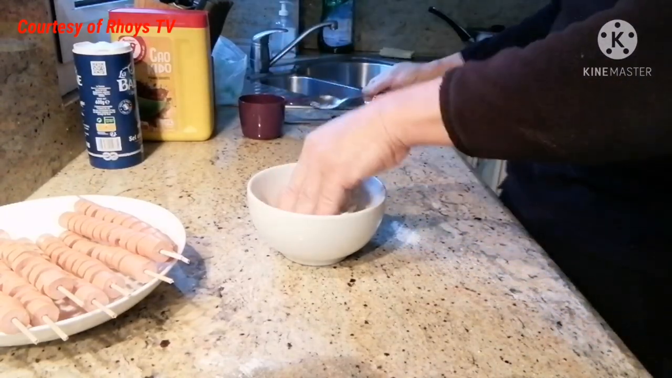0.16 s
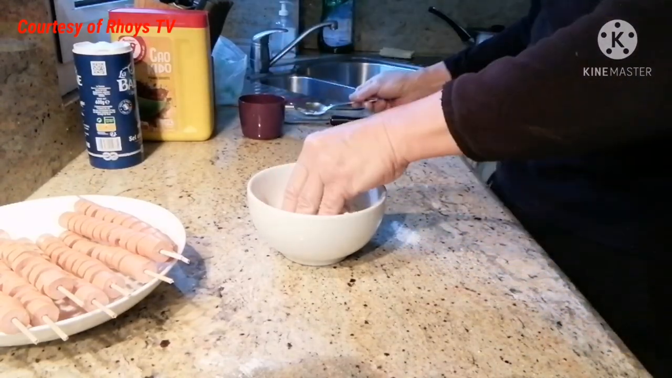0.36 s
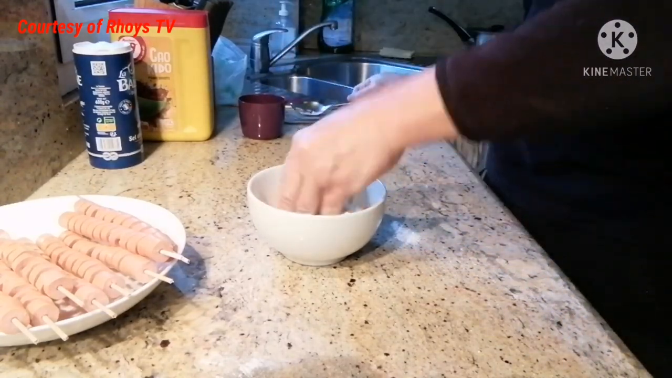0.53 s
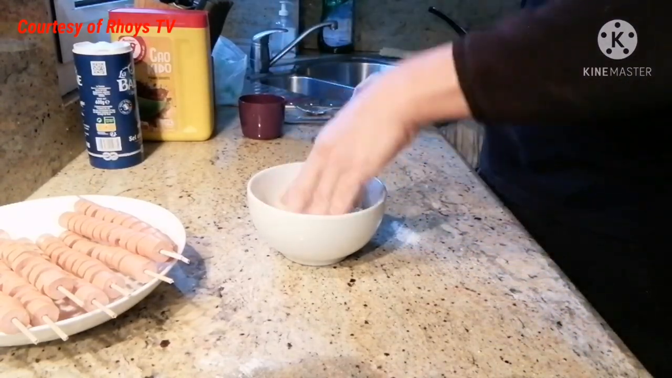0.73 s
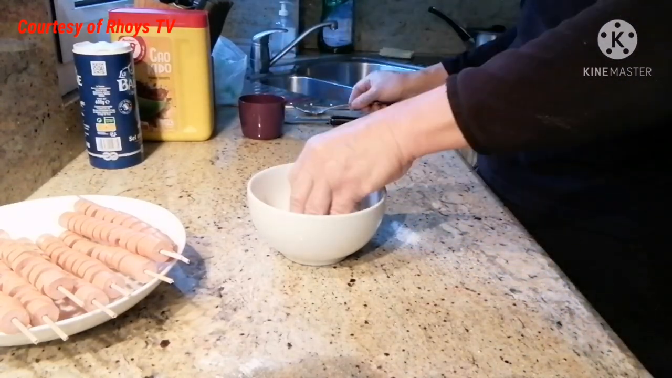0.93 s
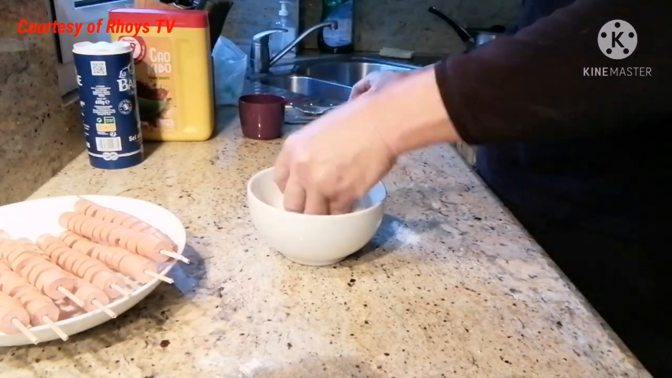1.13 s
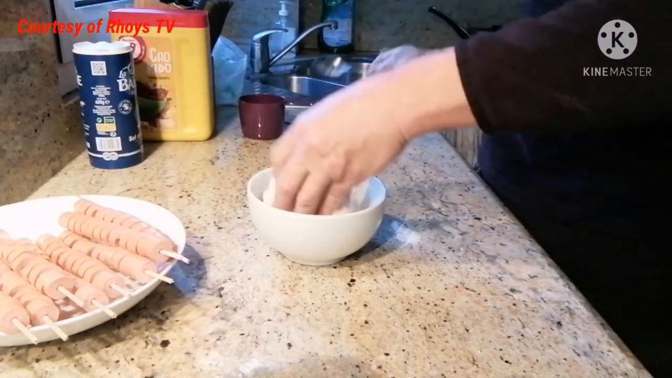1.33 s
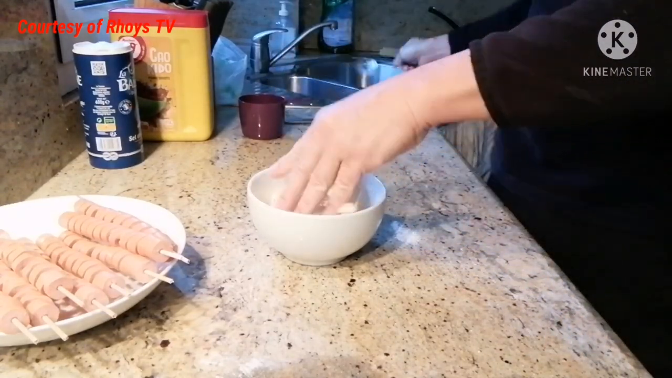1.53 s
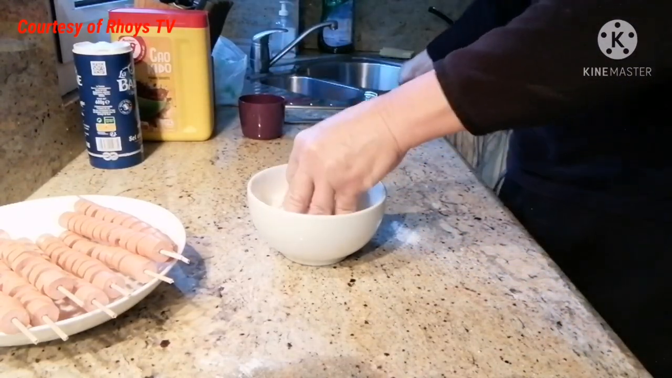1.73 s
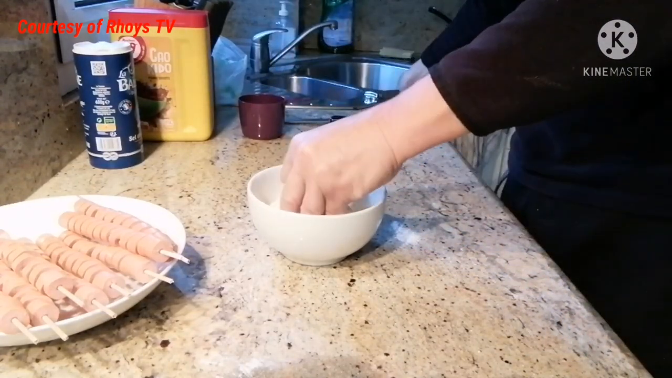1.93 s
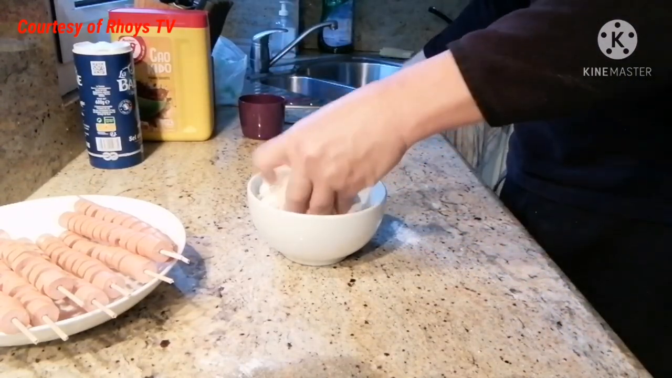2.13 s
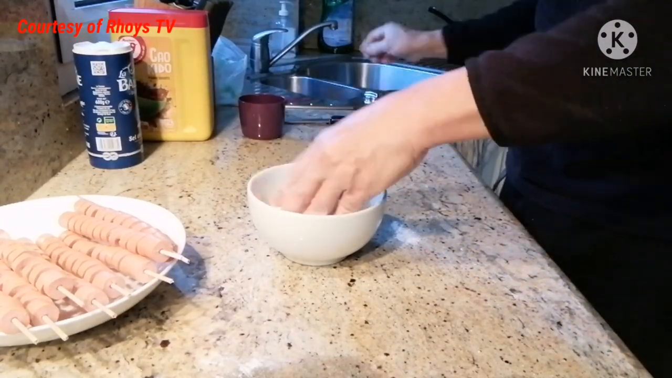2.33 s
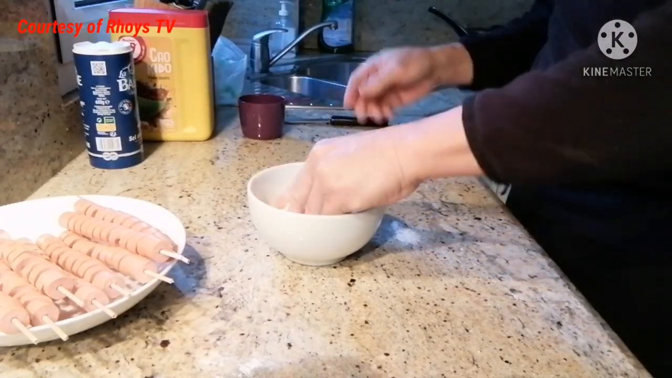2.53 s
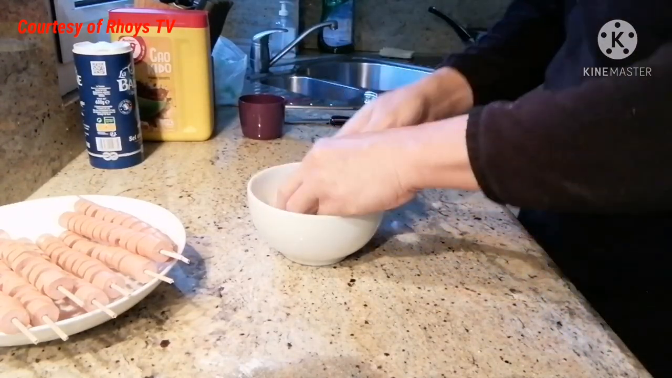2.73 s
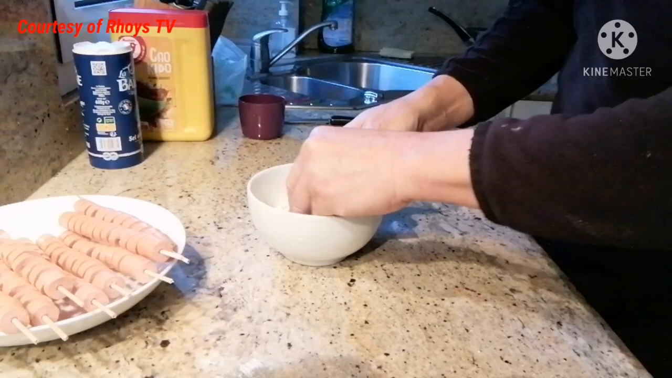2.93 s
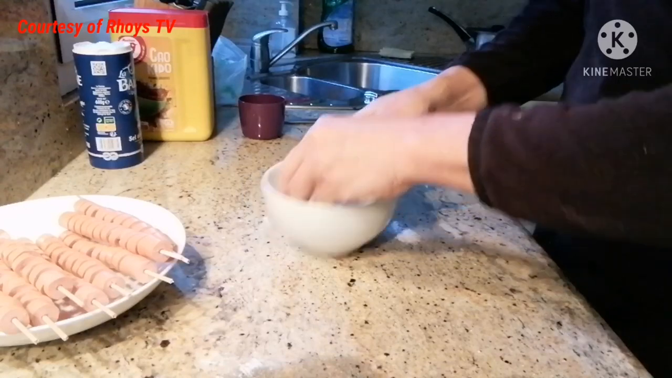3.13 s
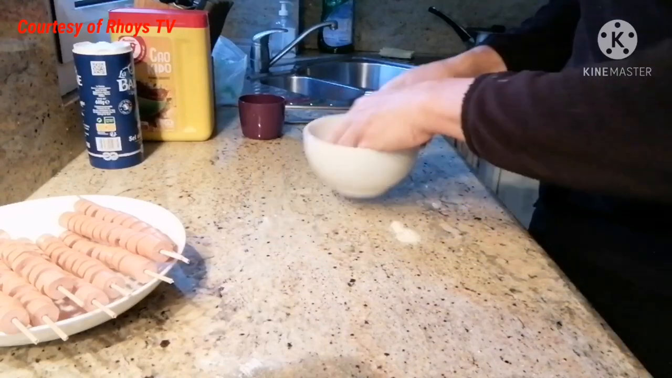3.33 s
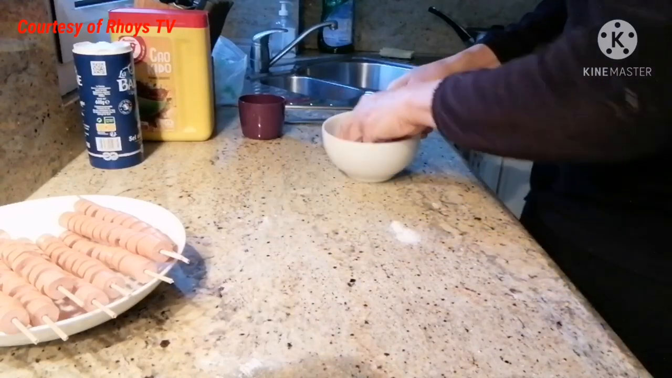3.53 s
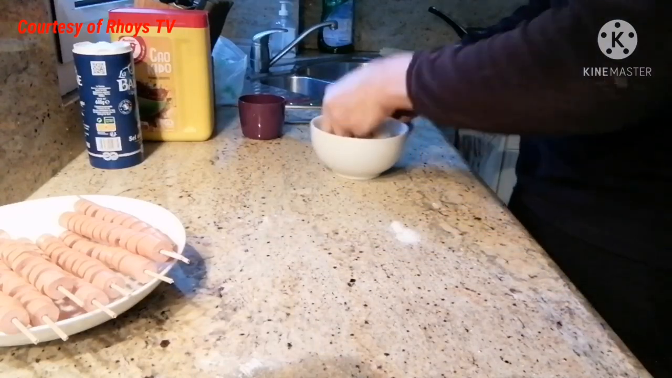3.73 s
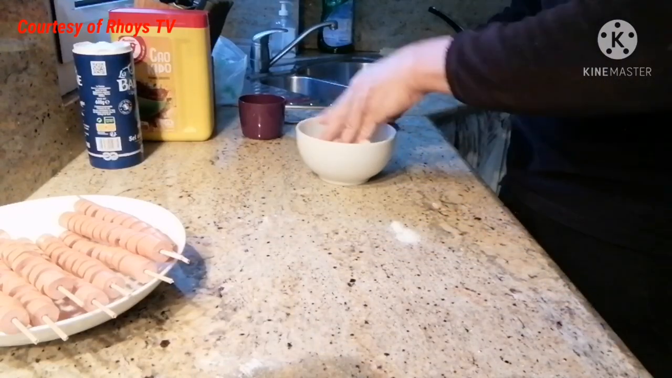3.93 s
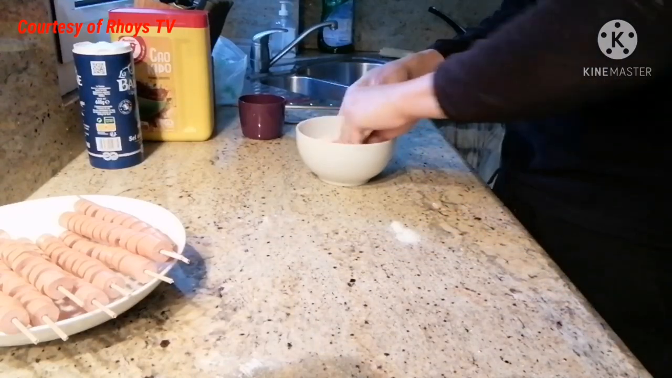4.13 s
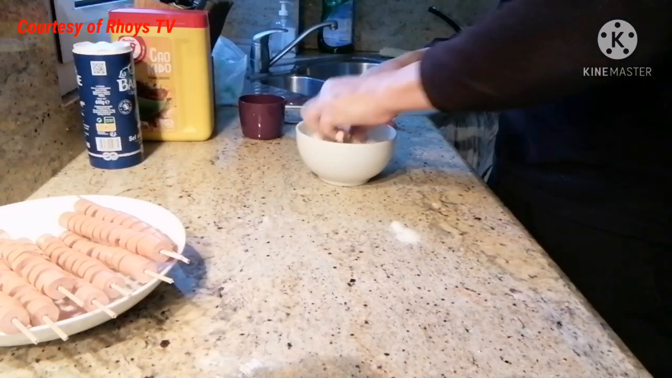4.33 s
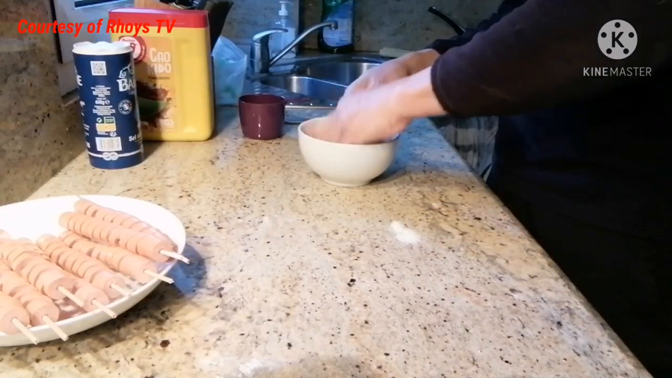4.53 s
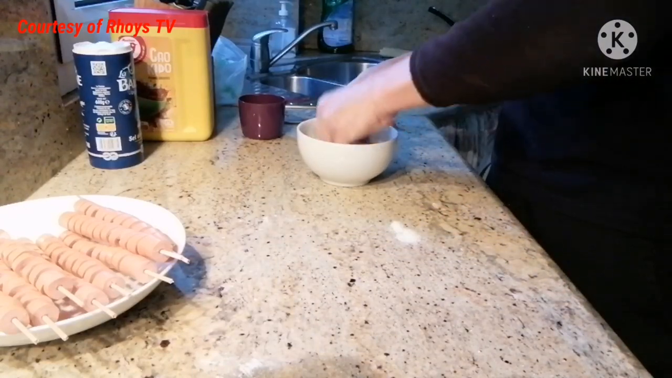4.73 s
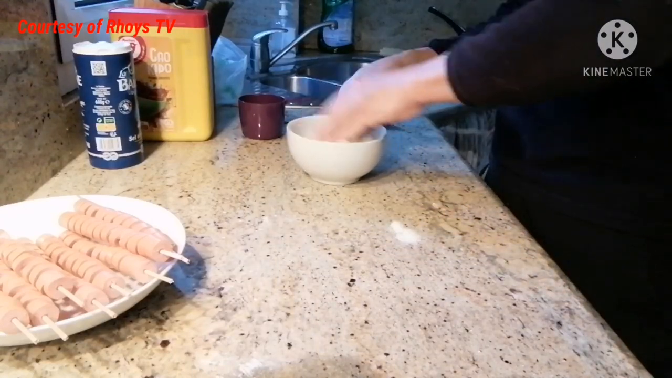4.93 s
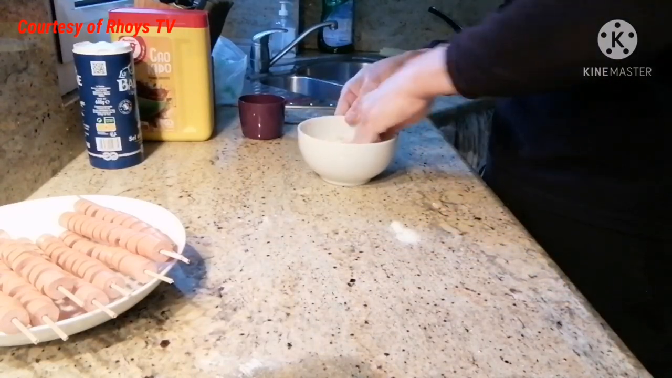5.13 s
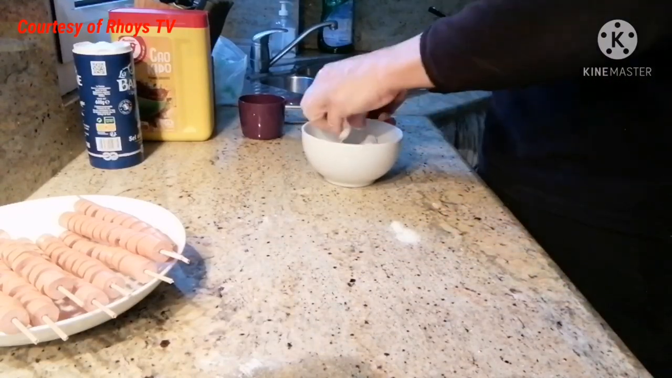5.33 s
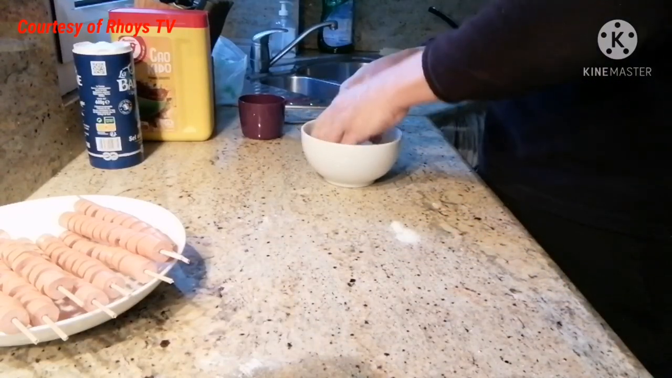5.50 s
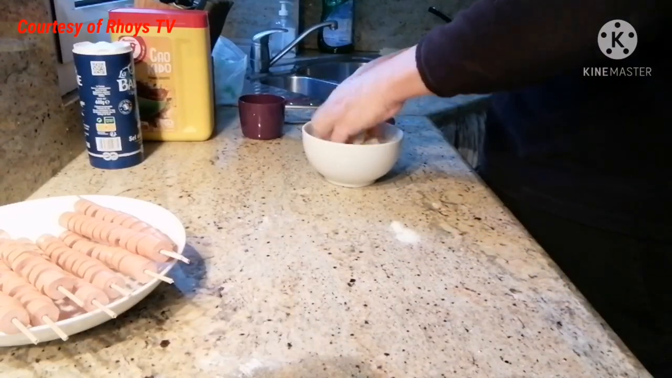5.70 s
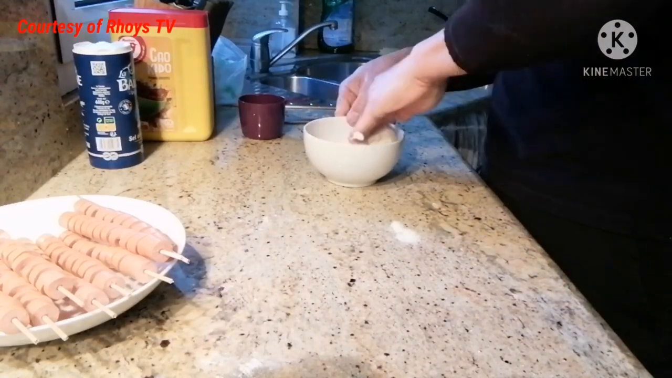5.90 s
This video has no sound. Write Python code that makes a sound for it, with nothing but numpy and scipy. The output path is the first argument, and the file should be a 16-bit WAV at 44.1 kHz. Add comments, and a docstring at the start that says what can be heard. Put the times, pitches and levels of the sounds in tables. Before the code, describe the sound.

Close stereo view of hand mixing on a kitchen counter: quiet at first, with airy motor noise, low hum and barely audible touches of the bowl. A quick burst of ringing metal comes from the sink, followed by a pause, a hard ceramic set-down, and shorter, softer knocks and wobbles. Brief room echoes follow, and the background dips slightly after the hard knock.

```python
"""In a hard-walled kitchen a hand mixes dough in a ceramic bowl on a stone counter.
An appliance runs behind: shaped noise for its fan and rumble, sines for its hum and whine; thin squeaks pass.
The bowl tips softly and dough snaps once (short noise); a utensil clatters on the steel sink (dense ringing
noise plus clear notes); then the bowl is set down and rocks on its foot (short modes plus gritty cracks), with
soft hand thumps (low modes) and another snap. A hard knock pulls the gain down, and it creeps back slowly."""
import sys
import numpy as np
from scipy import signal
from scipy.fft import rfft, irfft
from scipy.io import wavfile
from scipy.ndimage import uniform_filter1d

SR = 44100
rng = np.random.default_rng(int(sys.argv[2]) if len(sys.argv) > 2 else 0)


def master_out(mix):
    """Clip the mix to full scale and print it as 16-bit PCM to the path in sys.argv[1]."""
    frames = np.transpose(np.atleast_2d(mix))
    ceiling = np.clip(frames, -1, 1)
    pcm = np.round(ceiling * 32767).astype(np.int16)
    wavfile.write(sys.argv[1], SR, pcm)


N = 262836
RING = np.arange(SR) / SR  # one second of time [s]


def amp(db):
    """Decibels to gain."""
    return 10 ** (np.asarray(db) / 20)


def unit(x):
    """Scales to rms 1."""
    return x / np.sqrt(np.mean(x ** 2) + 1e-20)


def read(points, hz):
    """Reads a table on a log-frequency axis."""
    f, value = np.transpose(points)
    return np.interp(np.log(hz + 1), np.log(f + 1), value)


def lean(pan_db):
    """Left and right gains that differ by pan_db; positive leans left."""
    return amp([[pan_db / 2], [-pan_db / 2]])


def add(mix, s, sound, pan_db=0):
    """Mixes a sound in at time s, leaning left or right, and cuts it at the end of the mix."""
    part = mix[:, round(s * SR):][:, :sound.shape[-1]]
    part += (lean(pan_db) * sound)[:, :part.shape[1]]


# likeness of left and right in diffuse noise: (frequency [Hz], correlation [0-1])
LIKENESS = [(60, 0.98), (130, 0.99), (290, 0.53), (640, 0.22), (1400, 0), (15000, 0.0023)]


def noise(spectrum, size, bumps=()):
    """Coloured stereo noise of a diffuse field, rms 1: left and right are alike in the bass only."""
    hz = np.fft.rfftfreq(size, 1 / SR)
    a, b = rfft(rng.standard_normal((2, size)))
    same = np.clip(read(LIKENESS, hz), -1, 1)
    mid, side = a * np.sqrt(1 + same), b * np.sqrt(1 - same)
    db = read(spectrum, hz)
    for centre_hz, width_hz, bump_db in bumps:
        db = db + bump_db * np.exp(-2 * ((hz - centre_hz) / width_hz) ** 2)
    return unit(irfft(np.array([mid + side, mid - side]) * amp(db), size))


def fade(x, t60):
    """Lets each band die at its own speed."""
    hz, t, z = signal.stft(x, SR, nperseg=256)
    decay = amp(-60 * t / read(t60, hz)[:, None])
    return signal.istft(z * decay, SR, nperseg=256)[1][:, :x.shape[1]]


def mode(hz, t60, t, spread=None):
    """One dying mode; a spread [rad per kHz] sets left and right apart in phase, up to a limit."""
    skew = 0 if spread is None else np.clip(spread * hz / 1000, -np.pi / 4, np.pi / 4)
    return amp(-60 * t / t60) * np.sin(2 * np.pi * hz * t + np.array([[skew], [-skew]]))


def ripple(size, width_hz):
    """An uneven frequency response, rms 1: the crowded peaks of a metal sheet."""
    bins = max(round(width_hz * size / SR), 1)
    smooth = uniform_filter1d(rng.standard_normal(size // 2 + 1), bins)
    return unit(uniform_filter1d(smooth, bins))


# echo colour: (frequency [Hz], relative level [dB])
ROOM = [(100, 6.5), (200, 5), (400, 1), (650, -4.5), (900, 3), (1070, -5), (1250, -2.5), (1600, 0.5),
        (2500, 0.5), (5000, -5), (8000, -0.5), (15000, 1.5)]
# echo decay: (frequency [Hz], t60 [s])
ROOM_T60 = [(150, 0.56), (500, 0.43), (1000, 0.71), (2500, 0.54), (6000, 0.57), (14000, 0.34)]


def kitchen(x, build_s=0.021):
    """A hard-walled room whose echoes build up and die by band."""
    build_up = 1 - np.exp(-(RING / build_s) ** 2)
    tail = fade(noise(ROOM, SR), ROOM_T60) * build_up
    return signal.fftconvolve(x, tail / np.linalg.norm(tail[0]), axes=1)[:, :N]


# spectrum of the fan's air: (frequency [Hz], relative level [dB])
AIR = [(71, -34), (120, -5), (192, -3.5), (222, -9), (418, -3.5), (546, -10.5), (684, -1.5), (1240, -11.5),
       (1650, -10), (1790, -8.5), (3820, -13.5), (7200, -15.5), (9020, -26), (14700, -30.5), (16000, -24.5)]
# colour of the casing: (centre [Hz], width [Hz], boost [dB])
CASING = [(134.7, 60, 1.5), (620, 160, 2.5), (862, 86, 7.5), (1260, 680, 0.5), (1920, 280, 4.5),
          (2480, 160, 6.5), (4110, 810, -7), (5160, 250, 3), (6980, 640, 3)]


def fan(level_db=-55.5):
    """Broadband air noise, its spectrum bumped by the casing."""
    return amp(level_db) * noise(AIR, N, CASING)


# steady hum tones: (frequency [Hz], rms level before the lean [dB])
HUM = [(49.7, -61.5), (99.5, -69.5), (699, -73.5)]


def rumble_and_hum(rumble_db=-67, pan_db=3.5):
    """Low noise and steady hum tones, leaning left together."""
    t = np.arange(N) / SR
    rumble_spectrum = [(20, -25), (50, 2), (75, -7.5), (125, -2.5), (220, -14.0), (500, -69), (2000, -87)]
    rumble = amp(rumble_db) * noise(rumble_spectrum, N)
    hum = sum(amp(db) * np.sqrt(2) * np.sin(2 * np.pi * hz * (t + rng.random())) for hz, db in HUM)
    return (rumble + hum) * lean(pan_db)


# course of the whine's level: (time [s], level before the lift in whine() [dB])
WHINE = [(0.0, -77.5), (0.61, -72.5), (0.81, -71), (3.2, -66.5), (3.64, -70), (4.03, -76), (5.24, -71),
         (5.96, -73)]
# harmonics of the whine: (multiple of the pitch, relative level [dB])
WHINE_ORDERS = [(1, 0.5), (2, -15.5), (4, -16.5)]


def whine(pitch_hz=1760, waver_hz=2.55, lift_db=3.5):
    """A motor's harmonics on one slightly wavering pitch, set apart in phase between left and right."""
    t = np.arange(N) / SR
    drift = unit(uniform_filter1d(rng.standard_normal(N), SR // 12))
    phase = 2 * np.pi * np.cumsum(pitch_hz + waver_hz * drift) / SR
    offset = np.array([[0], [1]])  # left, right [rad]
    orders = sum(amp(db) * np.sqrt(2) * np.sin(round(k) * phase + offset) for k, db in WHINE_ORDERS)
    return amp(np.interp(t, *np.transpose(WHINE)) + lift_db) * orders


def appliance():
    """Fan noise, rumble, hum and motor whine sound together without a break."""
    return fan() + rumble_and_hum() + whine()


# faint high squeaks: (start [s], length [s], level [dB])
SQUEAKS = [(0.809, 0.081, -65), (2.88, .1, -66), (4.16, 0.18, -72)]
# their partials: (frequency [Hz], relative level [dB])
SQUEAK_NOTES = [(2850, -2), (5118, -2.5), (7748, 0)]


def squeaks():
    """A few thin partials swell and fade together."""
    out = np.zeros((2, N))
    for s, length, db in SQUEAKS:
        t = RING[:round(length * SR)]
        notes = sum(amp(g) * np.sin(2 * np.pi * (f * t + rng.random((2, 1)) / 3)) for f, g in SQUEAK_NOTES)
        add(out, s, amp(db) * np.hanning(len(t)) * notes)
    return out


# utensil hits the sink: (time [s], treble clash level [dB], mid clang level [dB], left-right lean of the clash [dB])
CLATTER = [(2.0802, -32.5, -45, -0.5), (2.123, -47, -52, -2), (2.238, -48, -53.5, 3),
           (2.2725, -28.5, -30.5, 4), (2.3242, -27.5, -38.5, -2.5), (2.388, -34.5, -42.5, 1),
           (2.432, -39, -44.5, -3)]
# spectra of the steel's treble clash, mid clang and low boom: (frequency [Hz], relative level [dB])
CLASH = [(900, -30), (2200, -4), (3200, -1), (4000, -6), (5200, 1), (7000, 2.5), (8500, -6.5),
         (11000, -8.5), (15000, -9)]
CLANG = [(250, -40), (550, -1), (900, 8), (1350, -4), (1600, 2), (2800, 1), (4500, -32)]
BOOM = [(50, -25), (80, -6.5), (110, -16), (170, -1), (300, 3.5), (410, 1.5), (520, -19), (1000, -42)]
# decay of the dense ringing, before a part's damping: (frequency [Hz], t60 [s])
STEEL_T60 = [(200, 0.48), (1000, 0.5), (3000, 0.46), (7000, 0.45), (11000, 0.39), (15000, 0.33)]
# clear notes of sink and utensil: (frequency [Hz], relative level before scatter [dB], t60 [s],
# driving part [0 clash, 1 clang, 2 boom])
STEEL_NOTES = [(187, -5, .4, 2), (295.6, -2, 0.38, 2), (364, -5.5, 0.2, 2), (398, 1.5, 0.27, 2),
               (591.7, -3.5, 0.33, 1), (1006, -11.5, .9, 1), (1300, 0, 0.38, 1), (2160, -14, 1.3, 1),
               (2740, -18, .4, 0), (4530, -11, 0.2, 0), (6450, -10, 0.35, 0), (7320, -13.5, 0.48, 0),
               (8535, -20, .42, 0), (11560, -32, .3, 0)]


def sink(rise_s=0.0021, strike_s=0.0067, chatter_db=1.5, scatter_db=1.5):
    """Thin steel has countless close modes that ring as noise, with clear notes on top; the utensil chatters."""
    boom_base_db, boom_follows = -25.5, 0.41  # the boom takes only this share of the clash's dB
    boom_pan_db, boom_damping = 4, 1.35
    flam_s, flam_db = 0.01, -14  # the utensil's other end follows each blow
    out, t = np.zeros((2, N)), RING[:SR * 3 // 4]
    attack = (1 - np.exp(-t / rise_s)) * (1 + np.exp(-t / strike_s) / 2)
    attack *= 1 + amp(flam_db) * (t > flam_s) * np.exp(-abs(t - flam_s) / strike_s)
    sheet = amp(3 * ripple(len(t), width_hz=40))
    for s, clash_db, clang_db, pan_db in CLATTER:
        chatter = amp(chatter_db * unit(uniform_filter1d(rng.standard_normal(len(t)), size=180)))
        spot = amp(2 * ripple(len(t), width_hz=410))  # each spot favours other regions of the spectrum
        boom_db = boom_base_db + boom_follows * clash_db
        parts = [(CLASH, clash_db, pan_db, 1), (CLANG, clang_db, 0, 1), (BOOM, boom_db, boom_pan_db, boom_damping)]
        for k, (spectrum, db, lean_db, damping) in enumerate(parts):
            dense = unit(irfft(rfft(noise(spectrum, len(t))) * sheet * spot, len(t)))
            dense = chatter * fade(dense, [(f, t60 / damping) for f, t60 in STEEL_T60])
            notes = 0
            for hz, note_db, t60, part in STEEL_NOTES:
                if round(part) == k:
                    gain = rng.choice([-1, 1]) * amp(note_db + scatter_db * rng.standard_normal())
                    notes = notes + gain * mode(hz, t60, t, spread=0.81)
            add(out, s, amp(db) * attack * (dense + notes), lean_db)
    return out


# sticky dough snaps off the fingers: (time [s], level [dB])
SNAPS = [(0.2945, -51), (5.41, -54.5)]


def dough_snaps(t60=0.059):
    """Small wet snaps: short bright noise that dies at once."""
    out, t = np.zeros((2, N)), RING[:SR // 4]
    for s, db in SNAPS:
        add(out, s, noise(CLASH, len(t)) * amp(db - 60 * t / t60))
    return out


# dull pushes of the hand: (time [s], level [dB])
THUMPS = [(4.063, -41.5), (5.112, -42), (5.133, -60), (5.181, -51)]
# low modes of the counter: (frequency [Hz], relative level [dB], t60 [s])
COUNTER = [(58.6, -1, 0.21), (98.3, -14.5, 0.41), (150, -3, 0.104), (284, -3, 0.039), (480, -8, 0.029)]


def counter_thumps(pan_db=3):
    """The hand's weight sets off the low modes of the counter."""
    out = np.zeros((2, N))
    for s, db in THUMPS:
        modes = sum(amp(g) * mode(f, t60, RING, spread=0.92) for f, g, t60 in COUNTER)
        add(out, s, amp(db) * modes, pan_db)
    return out


# the slab under the bowl's full weight: (frequency [Hz], relative level [dB])
THUD = [(50, -22), (80, -6), (110, -10.5), (160, 7), (230, -4), (340, -3.5), (500, -3), (700, 7.5),
        (1200, 1), (3000, -49.5)]


def set_down_thud(start_s=3.6312, level_db=-25, t60=0.093):
    """The slab answers the set-down with one short burst of low noise."""
    out, t = np.zeros((2, N)), RING[:SR // 5]
    add(out, start_s, noise(THUD, len(t)) * amp(level_db - 60 * t / t60))
    return out


# the bowl lands on one edge of its foot, then on the other: (time [s], blow level [dB],
# left-right lean before bowl() shifts it [dB], extra level of the wall modes [dB],
# extra level of the rim's clink [dB], rebound delay [s], rebound level against the blow [dB])
KNOCKS = [(3.6312, -9.5, 3.5, 4, 0, 0.016, -18.5), (3.7818, -17, 5.5, 3, 3, 0.015, -12.5),
          (4.6045, -18.5, 4, -3, 6, 0.0097, -.5), (4.6919, -17.5, 3.5, 5, -1, 0.012, 0.5),
          (5.003, -24, 7.5, -0.5, 12, .0376, -3), (5.527, -16, 6, 3, -4.5, .0086, -9)]
# the bowl tips softly under the hand: (time [s], level [dB])
ROCKS = [(0.265, -44), (0.3064, -42), (4.062, -39.5), (4.687, -25), (4.718, -30), (4.9877, -24),
         (5.0214, -22)]


def contacts():
    """Every touch of the foot, in the order bowl() unpacks it; harder knocks are brighter and start faster."""
    firm_db, firm_hz, hardening = -18, 3530, 0.6  # cut-off of a firm blow; it grows as this power of force
    rise_cycles = 0.44  # time constant of the onset, in cycles at the cut-off
    gritty_hz = 2500  # knocks softer than this crush less grit
    settle_per_db = 0.02  # the weaker the rebound, the flatter the bowl sits and the lower it rings
    for s, db, pan_db, wall_db, rim_db, after_s, rebound_db in KNOCKS:
        for late_s, less_db in [(0, 0), (after_s, rebound_db)]:
            hit_db = db + less_db
            hz = min(firm_hz * amp(hardening * (hit_db - firm_db)), SR / 3)
            soften = signal.butter(1, hz, fs=SR)
            grit, pitch = min(hz / gritty_hz, 1), 1 + settle_per_db * less_db
            yield s + late_s, hit_db, rise_cycles / hz, soften, grit, pitch, wall_db, rim_db, pan_db
    # a soft tip swells slowly, without grit, and its dull contact favours the lowest modes
    rise_s, dull_hz, wall_db, pan_db = 0.0024, 1240, -7, -3
    for s, db in ROCKS:
        yield s, db, rise_s, signal.butter(2, dull_hz, fs=SR), 0, 1, wall_db, 0, pan_db


# the bowl, damped by dough and hand: (frequency before settling [Hz], relative level before scatter [dB],
# t60 before the hand's limit [s])
BOWL = [(296, -28.5, 0.082), (497, -32, 0.079), (723, -21, 0.084), (935.4, -8.5, 0.071),
        (1070.5, -3, 0.073), (1310, -9.5, 0.039), (1427, -17.5, 0.051), (1560, -15, 0.072),
        (1695, -10.5, 0.039), (1992, -12.5, 0.051), (2258, -14.5, 0.089), (2550, -12, 0.034),
        (2815, -14, 0.03), (3340, -15, 0.035), (4280, -25, 0.022), (5200, -33, 0.039), (5860, -30, 0.034),
        (7020, -23, 0.077), (10790, -22.5, 0.053), (13100, -24, 0.041), (14640, -18, 0.061)]
# grit crushed under the foot: (frequency [Hz], relative level [dB])
CRACK = [(50, -25), (150, -6.5), (300, -12.5), (500, -8), (720, -3.5), (1000, 5.5), (1650, -2.5),
         (2500, -1.5), (4200, -9.5), (6500, -11.5), (8700, -28), (10500, -19.5), (15000, -28)]


def bowl(crack_db=-10, crack_t60=0.1, tick_s=0.0015, scatter_db=1, right_lag_s=0.00012, bass_hz=130):
    """Each contact rings the modes; knocks also crush grit; soft tips start slowly, sound dull, have no grit."""
    wall_hz, wall_width_hz, rim_hz = 1560, 160, 6500  # a tilted landing favours the wall modes
    held_t60, stiff_hz = 0.08, 3000  # the hand's limit [s]; settling detunes only modes below stiff_hz
    shift_db = -2.5  # moves every contact a little to the right
    out, t = np.zeros((2, N)), RING[:SR // 5]
    late = np.maximum(t - np.array([[0], [right_lag_s]]), 0)  # the modes reach the right a little later
    for s, db, rise_s, soften, grit, pitch, wall_db, rim_db, pan_db in contacts():
        ring = 0
        for k, (hz, mode_db, t60) in enumerate(BOWL):
            spot_db = wall_db * np.exp(-((hz - wall_hz) / wall_width_hz) ** 2) + rim_db * (hz > rim_hz)
            spot_db += scatter_db * rng.standard_normal()
            tuned_hz = hz * pitch if hz < stiff_hz else hz
            ring += (-1) ** k * amp(mode_db + spot_db) * mode(tuned_hz, min(t60, held_t60), late)
        crack = grit * noise(CRACK, len(t)) * amp(crack_db - 60 * t / crack_t60)
        crack *= 1 + np.exp(-t / tick_s)  # a brief tick at the front
        onset = 1 - np.exp(-late / rise_s)
        add(out, s, amp(db) * signal.lfilter(*soften, (ring + crack) * onset), pan_db + shift_db)
    return signal.lfilter(*signal.butter(2, bass_hz, "high", fs=SR), out)  # a small body radiates little bass


def scene(near_room_db=-13, sink_room_db=-13):
    """Bowl, dough and sink sound dry and in one room; the appliance and squeaks stay dry."""
    near = bowl() + set_down_thud() + counter_thumps() + dough_snaps()
    far = sink()
    echoes = kitchen(amp(near_room_db) * near + amp(sink_room_db) * far)
    return appliance() + squeaks() + echoes + far + near


def record(dry, threshold_db=-20, most_db=4.0, recover_db_per_s=0.26, attack_s=0.21, edge_hz=16000):
    """Gain control eases down a few dB at a loud knock and recovers slowly; then a low-pass limits the band."""
    power_db = 10 * np.log10(abs(uniform_filter1d((dry ** 2).mean(0), size=220)) + 1e-12)
    over_db = np.clip(power_db - threshold_db, 0, most_db)
    recovery = np.arange(N) / SR * recover_db_per_s
    held_db = np.maximum.accumulate(over_db + recovery) - recovery  # peak hold that leaks at a steady rate
    r = np.exp(-1 / (attack_s * SR))
    ducked = dry * amp(-signal.lfilter([1 - r], [1, -r], held_db))
    low_pass = signal.firwin(255, edge_hz, window=("kaiser", 8), fs=SR)
    return signal.oaconvolve(ducked, low_pass[None], "same")


dry = scene()
out = record(dry)
master_out(out)
```